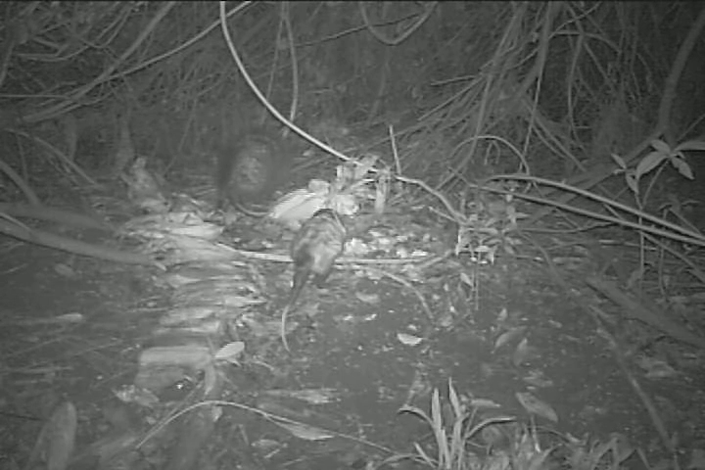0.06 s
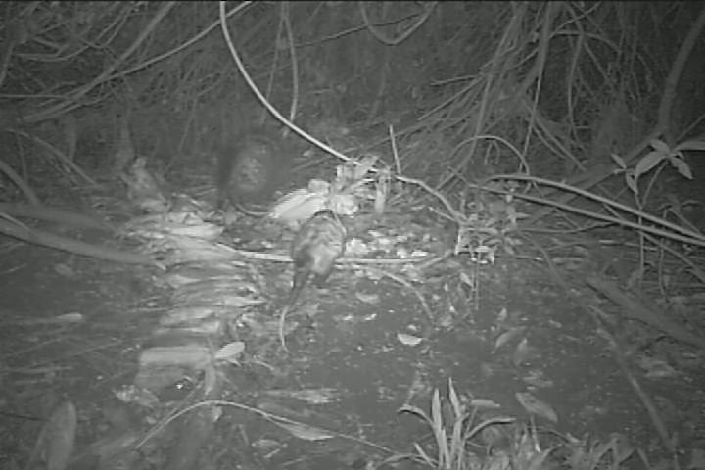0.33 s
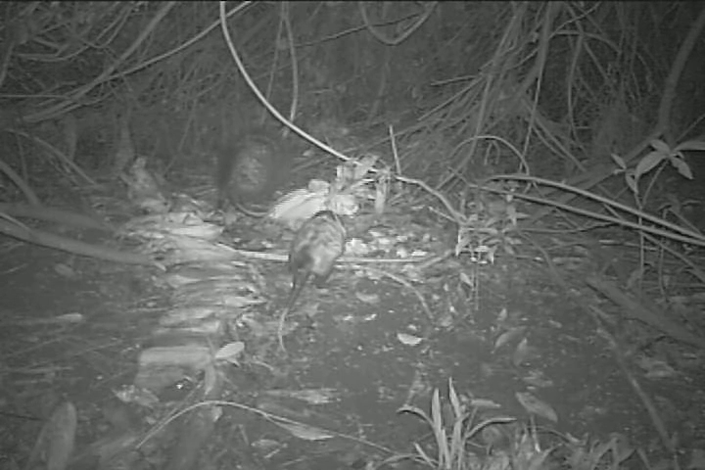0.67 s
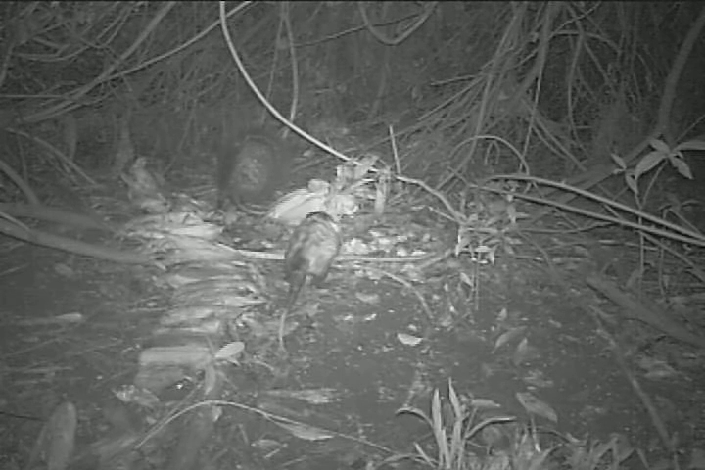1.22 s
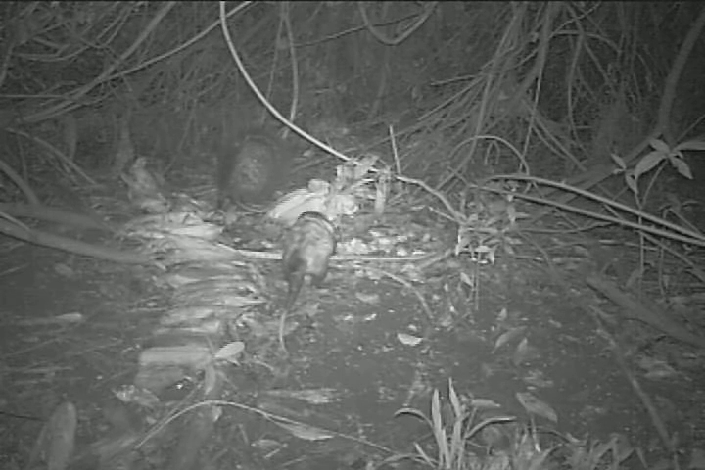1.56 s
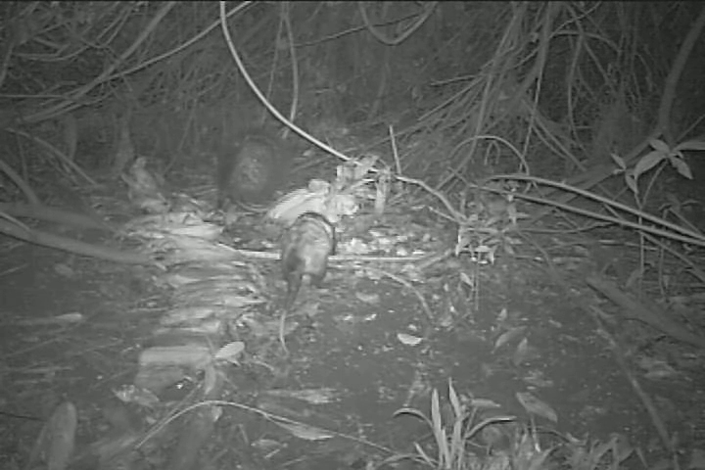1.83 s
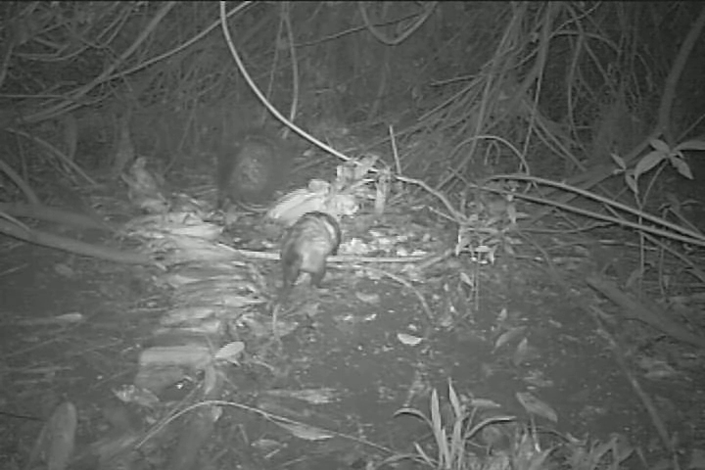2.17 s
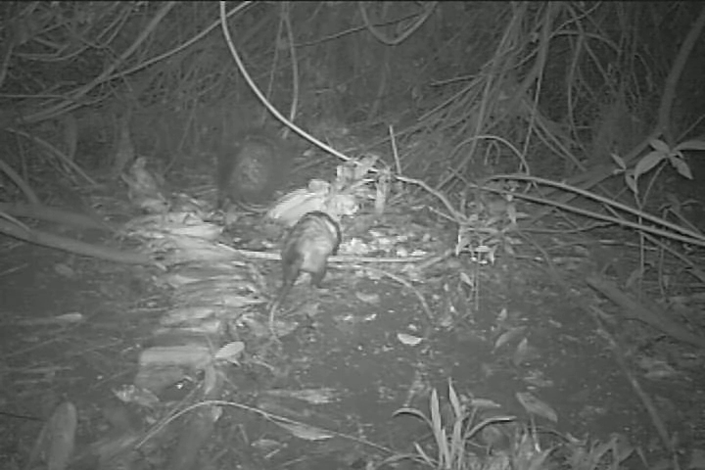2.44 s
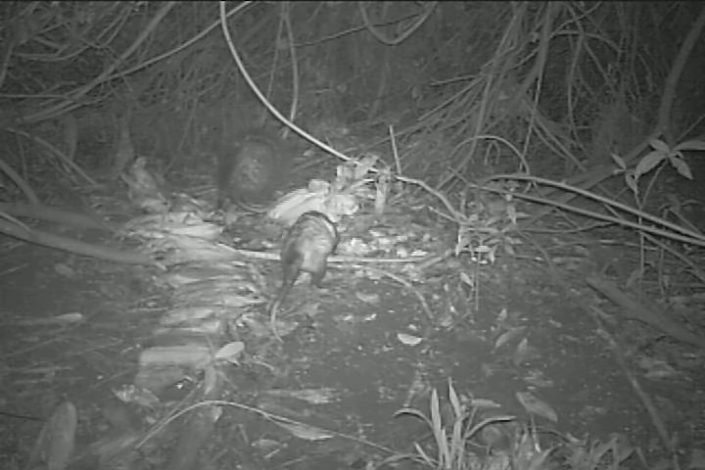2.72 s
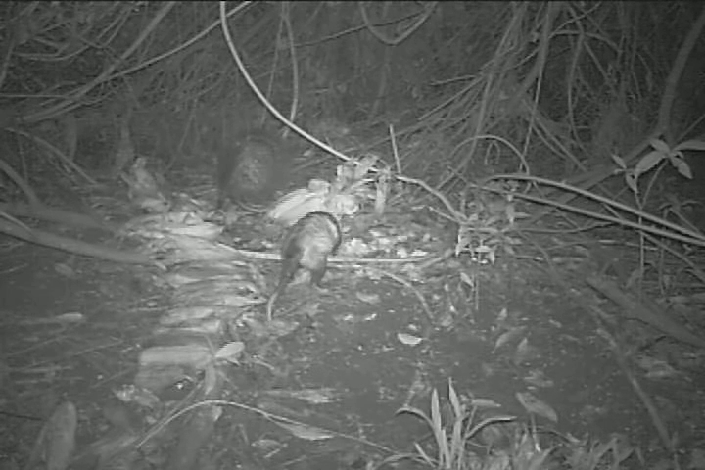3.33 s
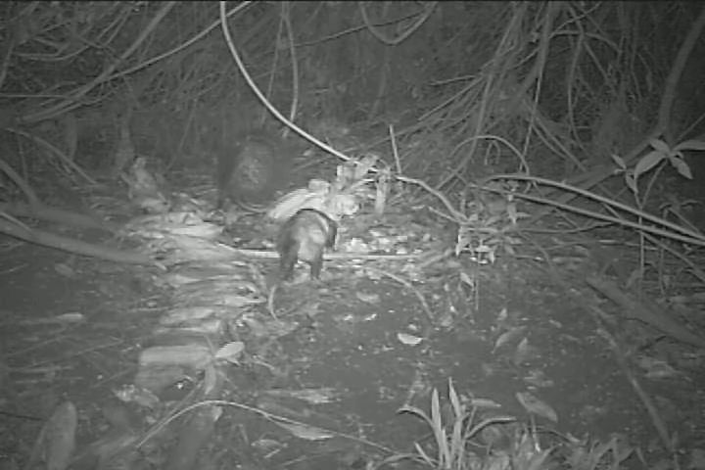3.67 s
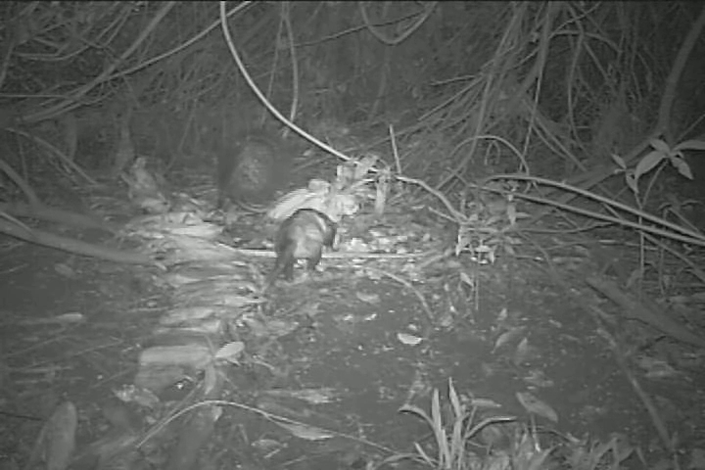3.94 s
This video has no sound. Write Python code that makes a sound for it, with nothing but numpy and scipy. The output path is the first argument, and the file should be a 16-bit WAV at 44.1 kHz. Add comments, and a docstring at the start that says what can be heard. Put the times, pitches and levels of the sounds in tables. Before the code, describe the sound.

Quiet forest at night, soft air puffs thumping the microphone over insects and hiss.

```python
"""Forest night at ground level.

Air puffs rumble and thump on the microphone and stir leaves. A distant low drone slowly fades.
Katydids scrape their wings about five times a second; far crickets trill; a thin buzz joins late.
A small feeding animal makes a few faint ticks. The recorder adds hiss and a thin whine."""
import sys
import numpy as np
from scipy import signal
from scipy.fft import rfft, irfft
from scipy.io import wavfile
from scipy.ndimage import uniform_filter1d

SR = 44100
rng = np.random.default_rng(int(sys.argv[2]) if len(sys.argv) > 2 else 0)


def wav_out(sig):
    """Save sig, one row per channel (or a flat mono array), as 16-bit PCM at SR to the path in sys.argv[1]."""
    wavfile.write(sys.argv[1], SR, np.round(np.clip(np.atleast_2d(sig).T, -1, 1) * 32767).astype(np.int16))


N = 176400
T = np.arange(N) / SR


def from_db(db):
    """Decibels to gain."""
    return 10 ** (np.asarray(db) / 20)


def unit_rms(x):
    """Scale to rms 1."""
    return x / np.sqrt(np.mean(x ** 2) + 1e-30)


def in_time(rows):
    """Join (time_s, value) rows by straight lines."""
    return np.interp(T, *np.transpose(rows))


def coloured_noise(spectrum):
    """Noise shaped by (freq_hz, gain_db) rows, rolled off below the first; rms 1."""
    hz, db = np.transpose(spectrum)
    bin_hz = np.maximum(np.arange(N // 2 + 1) * SR / N, 1e-3)
    gain = from_db(np.interp(np.log(bin_hz), np.log(hz), db))
    roll_off = np.minimum(bin_hz / hz[0], 1) ** 2
    return unit_rms(irfft(rfft(rng.standard_normal(N)) * gain * roll_off, N))


def resonate(x, hz, width_hz):
    """Two passes through a resonance, run in on the last second of x; rms 1."""
    radius = np.exp(-np.pi * width_hz / SR)
    section = [1 - radius, 0, radius - 1, 1, -2 * radius * np.cos(2 * np.pi * hz / SR), radius ** 2]
    return unit_rms(signal.sosfilt([section, section], np.r_[x[-SR:], x])[SR:])


def evened(x, span_s):
    """Divide out slow level swings."""
    size = int(span_s * SR)
    power = uniform_filter1d(uniform_filter1d(x ** 2, size), size // 2)
    return x / np.sqrt(np.abs(power) + 1e-12)


def air_puffs():
    """Puffs buffet the microphone; the stronger ones stir the leaves."""
    # puff strength: time_s, strength_db
    puffs = [(0.0, -53), (0.42, -38), (0.46, -45.5), (0.56, -38.5), (0.77, -46.5), (0.88, -41.5),
             (1.11, -56), (1.29, -43), (1.38, -46), (1.5, -42.5), (1.57, -51.5), (1.59, -45.5), (1.7, -41),
             (1.88, -55), (2.1, -50), (2.34, -60.5), (2.8, -57), (2.85, -47.5), (2.99, -64), (3.2, -54.5),
             (3.24, -45.5), (3.51, -46), (3.53, -42), (3.58, -54), (3.97, -68.5), (4.0, -65)]
    # buffeting spectrum: freq_hz, gain_db
    rumble_spectrum = [(12, -1.5), (25, 2), (50, -1), (90, -9), (135, -12.5), (170, -23), (250, -39),
                       (400, -53), (800, -65.5)]
    # leaf hiss spectrum: freq_hz, gain_db
    leaf_spectrum = [(500, -11), (1500, -7), (4000, 0.5), (9000, -11.5), (15000, -2)]
    puff_db = in_time(puffs)
    rumble = from_db(puff_db - 3) * evened(coloured_noise(rumble_spectrum), span_s=0.062)
    leaf_db = -80 + 0.67 * (puff_db - puff_db.max())
    return rumble + from_db(leaf_db) * coloured_noise(leaf_spectrum)


def drone():
    """Far, wavering drone: noise in narrow low resonances."""
    # drone envelope: time_s, level_db
    envelope = [(0, -67.5), (.3, -69.5), (1.0, -64), (1.4, -63), (1.95, -63.5), (2.4, -68), (2.8, -73),
                (3.4, -71), (4, -71.5)]
    # drone resonances: centre_hz, width_hz, gain_db
    bands = [(185, 20.7, 4), (210.8, 32.4, 1), (273, 54, -14), (383.6, 80, -19)]
    hum = sum(from_db(db) * resonate(rng.standard_normal(N), hz, width_hz) for hz, width_hz, db in bands)
    return from_db(in_time(envelope)) * evened(hum, span_s=0.24)


def wings(scrape):
    """Noise under a scrape envelope rings a katydid's wing; rms 1."""
    # wing resonances: centre_hz, width_hz, gain_db
    modes = [(8260, 1100, -6), (9170, 340, -5.5), (9585, 420, -2), (10160, 1100, -3.5), (11210, 390, -4.5)]
    return unit_rms(sum(from_db(db) * resonate(scrape * rng.standard_normal(N), hz, width_hz)
                        for hz, width_hz, db in modes))


def katydids():
    """Uneven tooth strikes drive the wing in swelling rasps; a far chorus fills the gaps."""
    # wing strokes: centre_s, length_s, level_db
    rasps = [(.02, 0.099, -78.5), (0.212, 0.16, -78.5), (0.387, 0.13, -76), (.58, .11, -78),
             (0.773, 0.16, -78), (0.945, .13, -79), (1.114, 0.18, -79.5), (1.315, 0.15, -76.5),
             (1.516, 0.15, -78), (1.677, 0.17, -80), (1.82, 0.15, -80), (2.015, 0.13, -76.5),
             (2.216, .11, -76.5), (2.405, .11, -76), (2.592, 0.1, -75.5), (2.77, 0.12, -78),
             (2.954, .13, -77.5), (3.123, 0.14, -78.5), (3.26, 0.14, -80.5), (3.42, 0.17, -78.5),
             (3.622, 0.12, -75.5), (3.795, 0.11, -76.5), (3.978, .11, -76.5)]
    teeth_per_s, tooth_decay_s, tooth_share = 680, 0.0018, 0.76
    rasp_shape, chorus_db = 2.4, -85.5   # shape 2 is a bell, more is flatter
    strikes = 1.0 * (rng.random(N) < teeth_per_s / SR)
    teeth = signal.lfilter([1], [1, -np.exp(-1 / (tooth_decay_s * SR))], strikes + 1e-18)
    scrape = np.sqrt(1 - tooth_share + tooth_share * teeth / teeth.mean())
    effort = sum(from_db(db) * np.exp(-np.abs(2 * (T - centre_s) / length_s) ** rasp_shape)
                 for centre_s, length_s, db in rasps)
    return effort * wings(scrape) + from_db(chorus_db) * wings(scrape=1)


def crickets():
    """Pulsed pure notes of far crickets blur into narrow bands, steady or throbbing."""
    # cricket bands: pitch_hz, width_hz, level_db, pulse_hz, pulse_depth
    trills = [(4270, 46, -92.5, 14, 0.6), (4487, 84, -100.5, 17, 0), (8260, 71, -98, 9.4, 1)]
    out = np.zeros(N)
    for pitch_hz, width_hz, level_db, pulse_hz, pulse_depth in trills:
        throb = 1 + pulse_depth * np.sin(2 * np.pi * (pulse_hz * T + rng.random()))
        note = evened(resonate(rng.standard_normal(N), pitch_hz, width_hz), span_s=0.069)
        out += from_db(level_db) * unit_rms(throb * note)
    return out


def noise_floor():
    """Steady forest air and microphone hiss."""
    # floor spectrum: freq_hz, gain_db
    spectrum = [(15, -1), (45, -7), (80, -16), (140, -24.5), (270, -24.5), (400, -29), (600, -31.5),
                (1000, -36), (2000, -39.5), (4000, -43), (7000, -44), (12000, -46), (15500, -47)]
    return from_db(-61.5) * coloured_noise(spectrum)


def whine(pitch_hz=15625, level_db=-85.5, flutter_hz=50.7, flutter_depth=0.26):
    """Thin, fluttering tone from the electronics."""
    flutter = 1 + flutter_depth * np.sin(2 * np.pi * flutter_hz * T)
    return from_db(level_db) * unit_rms(flutter * np.sin(2 * np.pi * pitch_hz * T))


def air_bumps(pitch_hz=58, width_hz=96, lowpass_hz=168):
    """Sudden tugs of air on the microphone, each one dull, heavily damped swing."""
    # air tugs: start_s, prefilter_peak_db
    tugs = [(.292, -36), (0.354, -42), (0.393, -40), (.414, -38), (0.567, -34), (.708, -41.5), (.875, -44),
            (0.944, -39), (1.445, -40.5), (1.493, -41.5), (1.675, -45), (1.697, -38), (3.257, -44),
            (3.346, -43.5), (3.527, -38), (3.618, -46.5)]
    out = np.zeros(N)
    for start_s, db in tugs:
        age_s = np.maximum(T - start_s, 0)
        swing = -age_s * np.exp(-np.pi * width_hz * age_s) * np.cos(2 * np.pi * pitch_hz * age_s)
        out += from_db(db) * swing / np.abs(swing).max()
    return signal.sosfilt(signal.butter(4, lowpass_hz, fs=SR, output="sos"), out)


def feeding(decay_s=0.0035, edge_ratio=2.6):
    """An animal cracks food and leaf litter: tiny dry noise bursts."""
    # cracks: start_s, level_db, centre_hz
    ticks = [(.571, -66, 5500), (1.51, -69, 7000), (1.836, -66.5, 1980), (3.891, -67, 2300)]
    out = np.zeros(N)
    for start_s, level_db, centre_hz in ticks:
        edges_hz = [centre_hz / edge_ratio, centre_hz * edge_ratio]
        band = signal.butter(2, edges_hz, "band", fs=SR, output="sos")
        envelope = (T >= start_s) * np.exp(-np.abs(T - start_s) / decay_s)
        out += from_db(level_db) * envelope * unit_rms(signal.sosfilt(band, rng.standard_normal(N)))
    return out


def insect_buzz():
    """A far insect's thin buzz, swelling late."""
    # buzz envelope: time_s, level_db
    envelope = [(0, -104), (2.3, -101), (2.9, -97), (4, -93)]
    return from_db(in_time(envelope)) * resonate(rng.standard_normal(N), hz=5410, width_hz=400)


def scene():
    """All sources over the steady floor, mono."""
    mix = air_puffs() + air_bumps() + drone() + katydids() + insect_buzz() + crickets() + feeding()
    return (mix + noise_floor())[None]


def record(dry):
    """The recorder adds its whine and cuts the top steeply."""
    cutoff_hz = 15700
    lowpass = signal.ellip(14, 0.1, 80, cutoff_hz, fs=SR, output="sos")
    return signal.sosfilt(lowpass, dry + whine())


dry = scene()
out = record(dry)
wav_out(out)
```